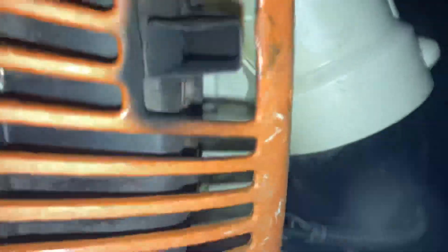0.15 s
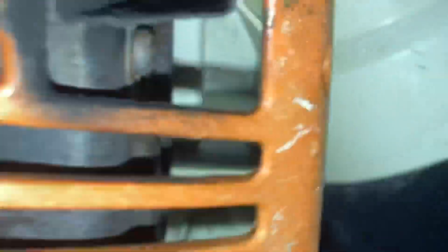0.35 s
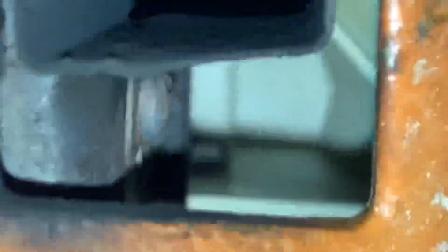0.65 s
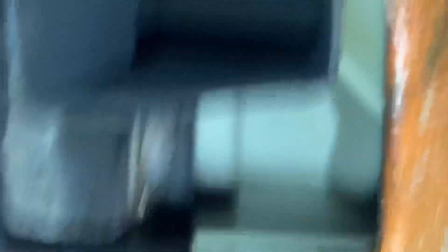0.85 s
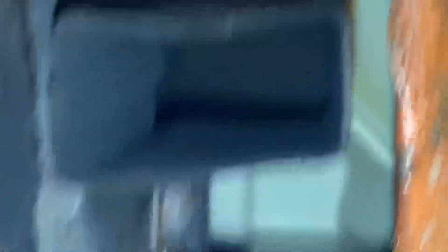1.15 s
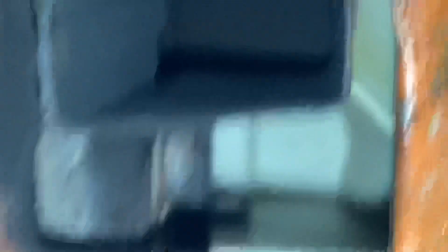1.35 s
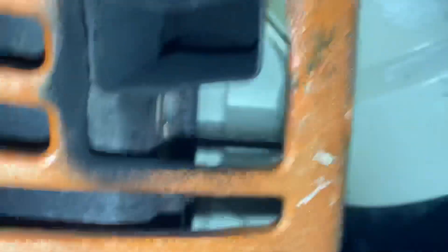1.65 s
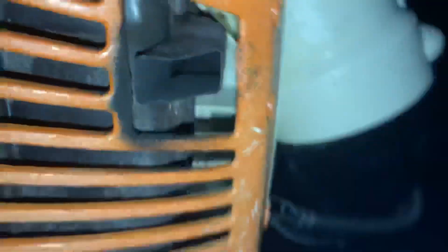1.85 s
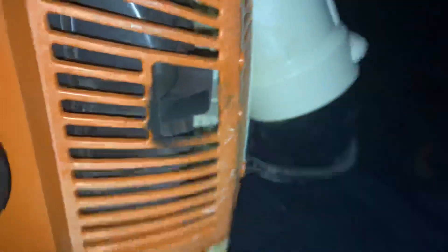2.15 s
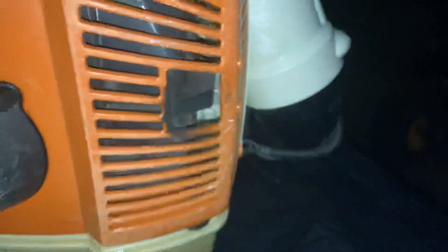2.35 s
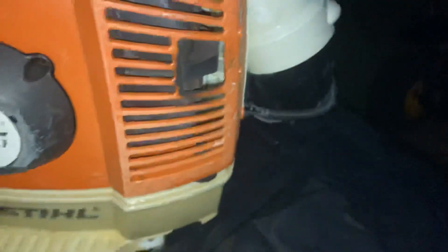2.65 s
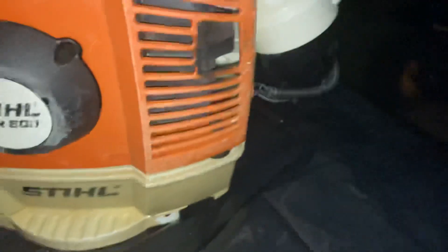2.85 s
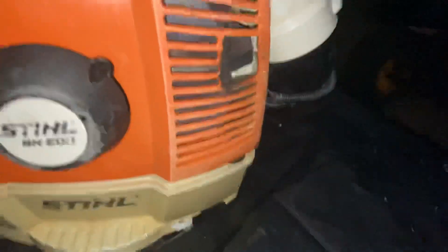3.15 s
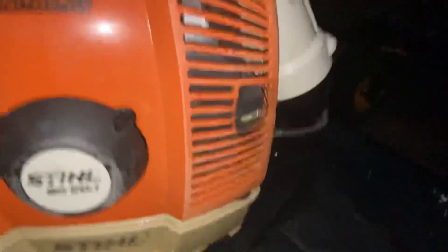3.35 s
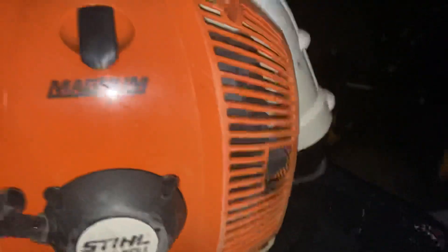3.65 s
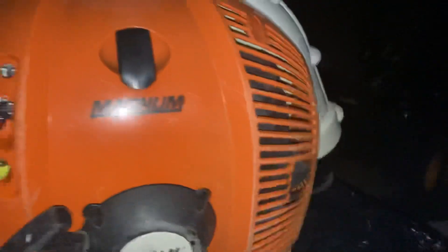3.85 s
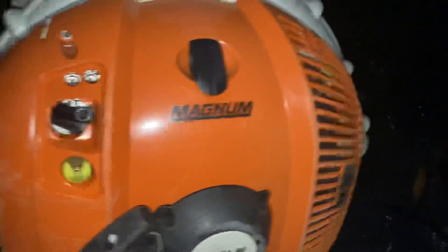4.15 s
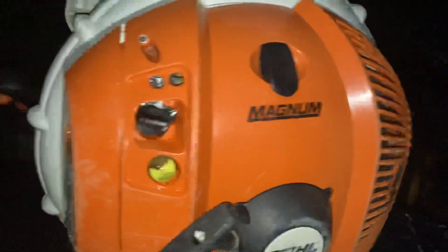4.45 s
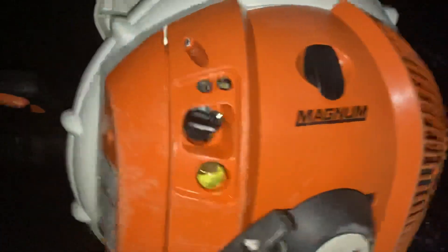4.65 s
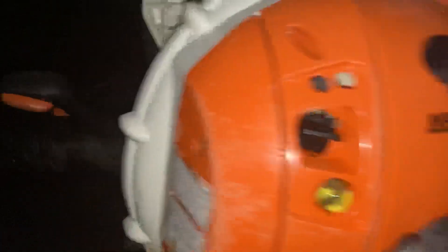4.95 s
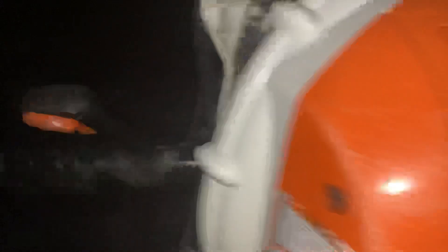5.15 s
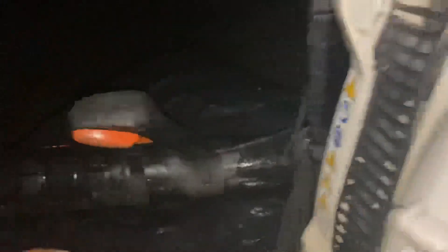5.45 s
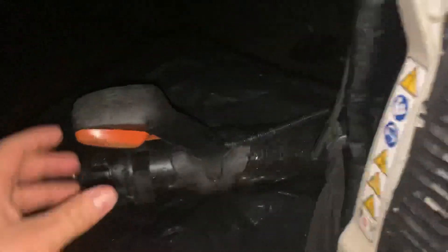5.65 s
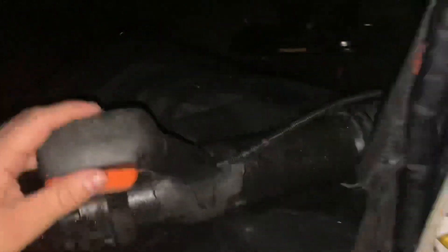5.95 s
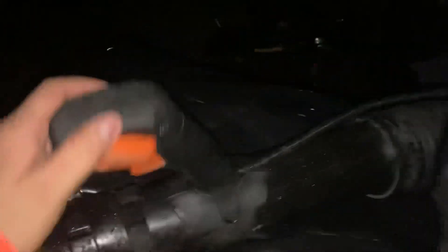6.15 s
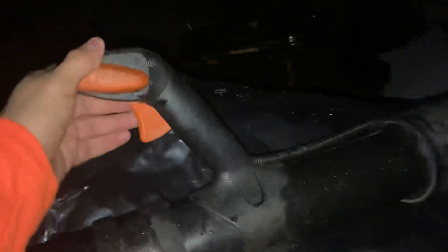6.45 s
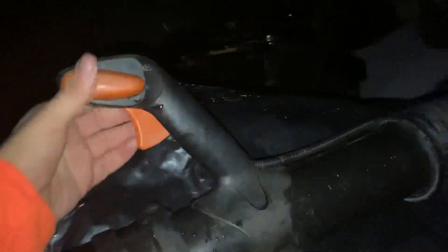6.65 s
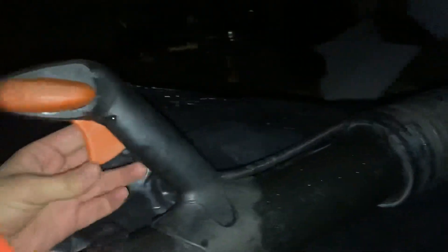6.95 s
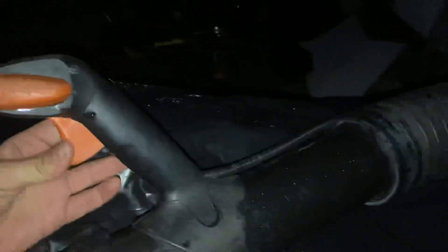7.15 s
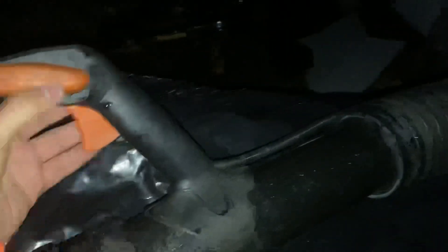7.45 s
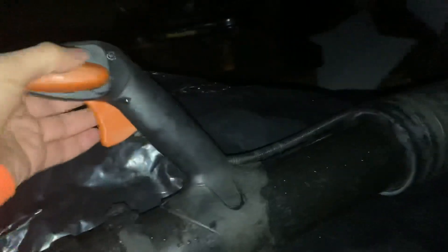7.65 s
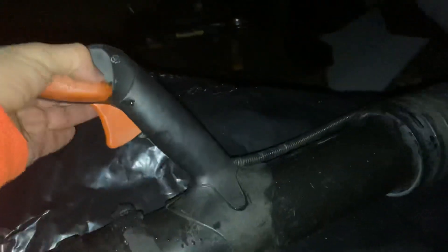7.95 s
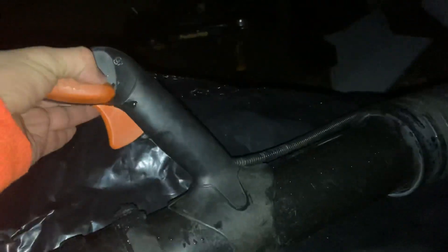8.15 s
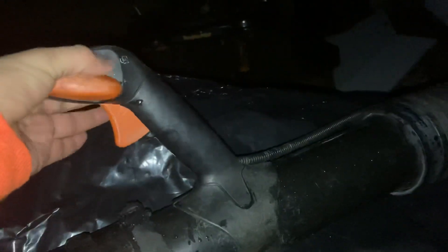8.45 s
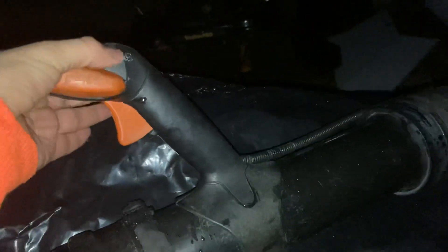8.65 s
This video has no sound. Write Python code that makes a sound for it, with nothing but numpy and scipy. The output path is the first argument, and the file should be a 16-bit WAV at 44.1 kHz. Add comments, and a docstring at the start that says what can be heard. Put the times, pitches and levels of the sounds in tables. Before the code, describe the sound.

A small leaf blower engine idles with uneven, hissing exhaust pops up close, then softens to a muffled putter and fan hum.

```python
"""Leaf blower at idle

A small four-stroke engine idles unevenly outdoors; most strong firings are followed by a weak one.
Each pop is a burst of gas that hisses, barks, thumps and rings the muffler shell. A hand-held
microphone pair starts at the exhaust, where the gas jet buffets it, and moves round the housing
to the handle, where the roar and hum of the fan cover the muffled exhaust."""
import sys
import numpy as np
from scipy import signal
from scipy.io import wavfile
from scipy.ndimage import uniform_filter1d

SR = 44100
rng = np.random.default_rng(int(sys.argv[2]) if len(sys.argv) > 2 else 0)


def transcribe(signal):
    """Save signal, clipped to [-1, 1], as a 16-bit WAV file at the path in sys.argv[1]."""
    frames = np.atleast_2d(signal).T
    limited = np.clip(frames, -1, 1)
    pcm = np.round(limited * 32767).astype(np.int16)
    wavfile.write(sys.argv[1], SR, pcm)


N = 388504
TIME = np.arange(N) / SR

# The groove, set by the firings that catch well: (time [s], hiss level [dB])
FIRINGS = [(0, -17.5), (0.053, -18), (0.1088, -11.5), (0.1644, -17.5), (0.2206, -15.5), (0.274, -22),
           (0.3322, -10), (.44, -12.5), (.494, -14), (0.5493, -17.5), (0.6044, -11), (0.715, -9.5),
           (.826, -12.5), (0.8811, -27.5), (0.936, -14), (1.044, -11.5), (1.099, -21), (1.155, -11.5),
           (1.2628, -12.5), (1.3732, -11), (1.4282, -11), (1.538, -11.5), (1.59, -20.5), (1.645, -18.5),
           (1.7022, -22), (1.759, -15), (1.817, -24.5), (1.8747, -15.5), (1.9317, -21), (1.989, -22.5),
           (2.0452, -15.5), (2.1542, -19), (2.209, -28.5), (2.263, -18.5), (2.3195, -26.5), (2.377, -16),
           (2.488, -15.5), (2.597, -18.5), (2.7096, -18.5), (2.766, -29), (2.8218, -18), (2.8791, -26.5),
           (2.936, -16.5), (3.049, -15), (3.1605, -19), (3.274, -14), (3.386, -14.5), (3.4989, -19.5),
           (3.6099, -19), (3.7232, -16.5), (3.8341, -19), (3.9469, -24), (4.0024, -27.5), (4.0591, -19.5),
           (4.1132, -28), (4.1702, -15.5), (4.2786, -16.5), (4.3337, -27.5), (4.447, -21.5), (4.56, -22),
           (4.6715, -20.5), (4.785, -23.5), (4.8939, -19.5), (5.004, -24), (5.1179, -25.5), (5.173, -32),
           (5.231, -28.5), (5.285, -39), (5.34, -32), (5.456, -35), (5.567, -40.5), (5.6835, -35),
           (5.7953, -37.5), (5.9044, -40), (6.1847, -39), (6.242, -44), (6.297, -43), (6.4097, -36.5),
           (6.5186, -42), (6.6301, -41.5), (6.7381, -39), (6.848, -45), (6.9042, -43.5), (7.017, -42),
           (7.069, -38.5), (7.18, -45.5), (7.236, -49), (7.347, -41), (7.4595, -42), (7.5126, -40),
           (7.57, -47.5), (7.626, -40.5), (7.739, -41.5), (7.8481, -44), (7.903, -43.5), (7.9586, -40.5),
           (8.067, -45.5), (8.1208, -40), (8.2316, -36), (8.3425, -43.5), (8.454, -40), (8.5625, -37.5),
           (8.669, -38.5), (8.721, -44)]


def cycles(spacing_s=.0555):
    """Start of every engine cycle, filled in evenly between good firings, and the good ones' indices."""
    good_s = np.transpose(FIRINGS)[0]
    good = np.append(0, np.cumsum(np.round(np.diff(good_s) / spacing_s))).astype(int)
    starts = np.interp(np.arange(good[-1] + 1), good, good_s)
    return np.append(starts, good_s[-1] + spacing_s), good


# Weight of a typical good firing: (time [s], bark level [dB], thump level [dB])
POP_BODY = [(0, -12, -20), (.17, -14, -20.5), (.25, -17.5, -29), (1.5, -17.5, -27.5), (1.9, -22, -27),
            (2.4, -21, -25), (3.7, -18, -25), (4.1, -20.5, -27.5), (4.4, -19, -31), (4.9, -18, -27),
            (5.4, -30, -31), (5.8, -28, -33), (6.4, -32.5, -35), (7.2, -33, -38), (8.81, -30.5, -33)]


def pops():
    """Time and hiss, bark and thump level of each pop; bark and thump partly follow its strength."""
    pop_s, good = cycles()
    good_s, good_db = np.transpose(FIRINGS)
    usual_db = np.interp(pop_s, good_s, uniform_filter1d(good_db, size=7, mode="nearest"))
    hiss_luck, bark_luck, thump_luck = rng.standard_normal((len(pop_s), 3)).T
    far = at_handle(pop_s)
    # Weak firings sit under their good neighbours, less deeply and less evenly at the handle.
    accent_db = np.minimum(-16 + 7.5 * far + (1 - 6.5 * far) * hiss_luck, 0)
    accent_db[good] = good_db - usual_db[good]
    bark_db = column(POP_BODY, 1, pop_s) + 0.64 * accent_db + bark_luck
    thump_db = column(POP_BODY, 2, pop_s) + 0.2 * accent_db + 2 * thump_luck
    return pop_s, usual_db + accent_db, bark_db, thump_db


def on_pops(gains, shape):
    """Triggers one shape on every pop, each with its own gain."""
    triggers = np.zeros(N, gains.dtype)
    triggers[np.round(cycles()[0] * SR).astype(int)] = gains
    return signal.oaconvolve(triggers, shape)[:N]


def accent(db):
    """How far each pop stands above its neighbours, in dB."""
    return db - uniform_filter1d(db, size=9)


def puff(rise_s, fall_s):
    """Envelope of a gas burst, peak 1."""
    t = np.arange(4000) / SR
    shape = (1 - np.exp(-t / rise_s)) ** 4 * np.exp(-t / fall_s)
    return shape / shape.max()


def jet(gas, db, burst_shape, push_db, follow, push_s, end_s):
    """Noise in a sudden blow-down burst, then a slower piston push that only partly follows the accent."""
    t = np.arange(2500) / SR
    accent_db, far = accent(db), at_handle(cycles()[0])
    weak_db = np.minimum(accent_db, 0)  # a weak firing leaves little pressure to blow down
    burst_db = db + weak_db - 1.5 * far  # the housing softens the burst at the handle
    burst = on_pops(amp(burst_db), burst_shape)
    spike_shape = np.exp(-((t - .0045) / .0012) ** 2)  # the valve flow peaks in a short snap
    spike = on_pops((1 - far) * amp(burst_db + weak_db + 3), spike_shape)
    stroke = np.sin(np.pi / 2 * np.minimum(t / push_s, 1)) ** 2
    stroke *= np.exp(-np.maximum(t - 2 * push_s, 0) / end_s)
    push = on_pops(amp(db - (1 - follow) * accent_db + push_db), stroke)
    # Behind the housing each burst arrives scattered, as a smear that opens just ahead of it.
    smear = on_pops(far * amp(db - 4.5), puff(rise_s=0.0035, fall_s=0.013))
    early = round(0.0069 * SR)
    smear = np.pad(smear[early:], (0, early))
    spits = amp(6.6 * uniform_filter1d(rng.standard_normal(N), size=49))  # turbulence breaks up the jet
    return gas * np.sqrt(burst ** 2 + spike ** 2 + push ** 2 + smear ** 2) * spits


# Gas EQ, one curve each for exhaust, side and handle: (frequency [Hz], level [dB])
GAS_EQ = [
    [(250.0, -13), (330, -3.5), (430, 14.5), (560, -1), (660, -5), (817.0, -11.5), (1250.0, -7),
     (2500, -13.5), (3000, -12), (3700, -6.5), (4800, -11.5), (5500, -12.5), (6000, -24), (6700, -11.5),
     (7580.0, -11.5), (8490.0, 7), (11300.0, 8.5), (15300.0, -3.5), (16200.0, -48), (16700.0, -53)],
    [(250.0, 3), (535.0, -13.5), (690.0, -8.5), (1280.0, -5.5), (2120, -8.5), (2600.0, -5.5), (4050.0, 0),
     (4300, -0.5), (5650, -2.5), (6400, 1), (7250.0, 10.5), (8200, 1), (10900.0, 0.5), (15300.0, -6),
     (16200.0, -37), (16700.0, -40)],
    [(250, -57), (350, -10.5), (540, 10.5), (640, -5), (790, -12), (1070, -9.5), (1520, -9), (2100, -16),
     (2750, -18), (5400, -29.5), (8250, -23), (11300, -25), (16700, -52)],
]
# Fader on the rasp, the lower part of the hiss: (time [s], gain [dB])
RASP_FADER = [(0, 1.5), (.8, -2), (1.5, -3), (2.3, 2.5), (3.2, -3), (4, 1), (4.7, -2.5), (5.3, 4.5), (6, 5),
              (7, 3.5), (8.81, 3.5)]


def exhaust_hiss(pop_s, hiss_db, split_hz=6600):
    """Top end of the escaping gas: a rasp, a shorter bright snap, and a valve tick after each pop."""
    gas = noise(GAS_EQ, 3000, 20000, flicker_db=4.5)
    dull = signal.sosfiltfilt(signal.butter(4, split_hz, fs=SR, output="sos"), gas)
    bright = gas - dull
    rasp_db = hiss_db + column(RASP_FADER, 1, pop_s) - 2
    rasp = jet(dull, rasp_db, puff(0.0026, 0.0081), push_db=-2, follow=0.6, push_s=0.0063, end_s=0.0036)
    snap = jet(bright, hiss_db - 2.5, puff(0.0017, 0.004),
               push_db=-4.5, follow=0.39, push_s=0.0065, end_s=0.0038)
    near = np.clip(1.1 - place_at(pop_s), 0, .5)
    casing_db = column(BED_FADERS, 2, pop_s)
    tick = on_pops(near * amp(casing_db + 3), puff(rise_s=.001, fall_s=0.003))
    tick_delay = round(0.032 * SR)
    return rasp + snap + bright * np.pad(tick, (tick_delay, 0))[:N]


def exhaust_body(pop_s, bark_db):
    """Midrange of the escaping gas: a hard bark over the steadier throb of the muffler."""
    bark = jet(noise(GAS_EQ, 944, 2700, flicker_db=3), bark_db - 10, puff(0.0019, 0.01),
               push_db=-1, follow=0.17, push_s=0.0074, end_s=0.0044)
    throb_db = column(BED_FADERS, 3, pop_s) + 0.24 * accent(bark_db) + 0.16
    throb = jet(noise(GAS_EQ, 330, 890, flicker_db=4.5), throb_db, puff(0.001, 0.0058),
                push_db=-3.5, follow=0.44, push_s=0.0096, end_s=0.0039)
    return bark + throb


def exhaust_thump(thump_db):
    """Low punch of the pressure pulse; its pitch drops as the muffler empties."""
    t = np.arange(2500) / SR
    turns = 75 * t + 1.5 * (1 - np.exp(-t / .0055))  # dives from about 350 to 75 Hz
    envelope = (1 - np.exp(-t / 0.00051)) ** 2 * np.exp(-(t / 0.022) ** 2)
    thump = envelope * np.cos(2 * np.pi * (turns - .15))
    return pan(on_pops(amp(thump_db - 0.5), thump))


# Modes of the muffler shell and cylinder fins:
# (frequency [Hz], t60 [s], level at exhaust [dB], at grille [dB], at side [dB], at handle [dB])
SHELL_MODES = [(891, 0.041, -16, -12, -23, 2.5), (1058, 0.035, 1.5, -10, -22, 5.5),
               (1259, 0.023, 3, 6, 3, -1), (1452, 0.022, -15, 1.5, 5.5, -13),
               (1648, 0.037, -8, -23, 5, -12), (2073, 0.027, 4.5, -21, -20, -28.5),
               (2571, 0.029, -6, 3, -9.5, -20), (2706, 0.039, -4.5, -19, -7, -3),
               (3270, .03, -2, -2, -43, -18), (3524, 0.033, -15, -5, -5.5, -30),
               (3694, 0.034, -12, -1, -12, -17), (4210, 0.049, -16.5, -2, -11.5, -14)]


def shell_ring(pop_s, bark_db, scatter=.35):
    """Each firing rings the metal, every mode with a strength and phase of its own."""
    t, out = np.arange(3000) / SR, np.zeros((2, N))
    place, far = place_at(pop_s), at_handle(pop_s)
    strikes = 1 + rng.standard_normal((len(pop_s), len(SHELL_MODES), 2)) @ [scatter, 1j * scatter]
    strikes *= np.exp(2j * np.pi * rng.random(strikes.shape))
    spreads = np.exp(1.2j * far * rng.standard_normal(strikes.shape).T)  # wider image at the handle
    for (hz, t60, *place_db), strike, spread in zip(SHELL_MODES, strikes.T, spreads):
        mode_db = np.interp(place, [.25, .76, 1.15, 1.7], place_db)  # exhaust, grille, side, handle
        gains = strike * amp(bark_db + 3 + 0.5 * far + mode_db + ground_echo_db(hz, pop_s))
        ring = amp(-60 * t / t60) * (1 - np.exp(-t / 0.0046)) ** 2 * np.exp(2j * np.pi * hz * t)
        lean = left_gain(np.array([hz]), pop_s)[0]
        lag = np.exp(-1j * left_lead(np.array([hz]), pop_s)[0])
        out[0] += on_pops(gains * lean, ring).real
        out[1] += on_pops(gains * lag * spread / lean, ring).real
    return out


def buffet(pop_s, hiss_db):
    """The slug of gas from a strong firing hits the microphone a moment later as a falling low whump."""
    t, out = np.arange(-900, 1800) / SR, np.zeros(N + SR)
    levels_db = hiss_db + column(WALK, 3, pop_s)
    for at, db, (late, pitch, phase) in zip(pop_s, levels_db, rng.random((len(pop_s), 3))):
        hz = 75 * (0.7 + .6 * pitch)
        whump = np.exp(-(t / .012) ** 2) * np.cos(2 * np.pi * (hz * t * (1 - 15 * t) + phase))
        start = round((at + 0.0141 + 0.0022 * late) * SR)
        out[start:start + len(t)] += amp(db) * whump
    return pan(out[:N])


# Fan and casing EQ, one curve each for exhaust, side and handle: (frequency [Hz], level [dB])
FAN_EQ = [
    [(40.0, 3), (89.9, 13.5), (305, 2.5), (380, 0), (430, 16.5), (560, -14), (650, -11.5), (904.0, -29),
     (2700.0, -29.5), (3800, -34.5), (4700, -43), (5500, -46), (6700, -39.5), (7650.0, -47), (8390.0, -40),
     (11100.0, -35.5), (16000.0, -56), (16700.0, -81)],
    [(40.0, -3), (152.0, -31), (179.0, 2.5), (228.0, -4.5), (290, -5.5), (556.0, -12), (769.0, -3),
     (1150.0, -16), (1870.0, -7.5), (2120.0, -14), (2700, -11), (3500, -22.5), (4600, -19), (5300, -26),
     (7200, -21), (9100.0, -28.5), (15400.0, -38), (16000.0, -66), (16700.0, -94)],
    [(40, -15), (150, -6.5), (230, -6), (340, -3), (540, -11.5), (610, -28), (790, -23.5), (1150, -24.5),
     (1470, -22), (2200, -37), (2700, -31), (5700, -46), (6700, -41.5), (9100, -47), (15400, -54.5),
     (16700, -85)],
]
# Faders of the steady bed: (time [s], fan roar [dB], casing hiss [dB], muffler throb [dB])
BED_FADERS = [(0.0, -24.5, -32.5, -26), (0.19, -32.5, -39, -28), (0.44, -31, -37, -24),
              (0.78, -40, -39, -30.5), (1.37, -32.5, -38, -27), (2.45, -38.5, -41, -32),
              (4.39, -37.5, -42.5, -35), (5.6, -37, -45, -37), (6.87, -36.5, -46.5, -39),
              (8.46, -34, -46, -35), (8.81, -34.5, -43, -45)]


def fan():
    """Low roar of the impeller under the airy hiss of the casing."""
    roar = amp(column(BED_FADERS, 1, TIME) - 1.36) * noise(FAN_EQ, 20, 696, flicker_db=0.5)
    casing = amp(column(BED_FADERS, 2, TIME) + 0.9) * noise(FAN_EQ, 788, 21600, flicker_db=3.5)
    return roar + casing


BLADE_ORDER = 12  # the impeller hums at this multiple of the firing rate
# Fader on the impeller hum: (time [s], level [dB])
HUM_FADER = [(0, -48), (1.5, -46), (1.9, -47.5), (2.3, -43), (2.9, -43), (3.5, -41), (4.0, -41.5),
             (4.3, -39.5), (4.9, -40.5), (5.5, -39.5), (6, -43), (6.4, -50), (7, -47.5), (7.5, -42),
             (8.0, -54), (8.4, -51), (8.8, -45.5)]


def impeller_hum(pop_s, hiss_db):
    """A tone and its octave follow the impeller; a strong firing jolts it and swells the hum."""
    accent_db = np.interp(TIME, pop_s, accent(hiss_db))
    phase = 2 * np.pi * BLADE_ORDER * crank(pop_s) + 0.05 * accent_db
    octave = amp(-18 + 24 * past_side(TIME)) * np.sin(2 * phase)
    level = np.sqrt(2) * amp(column(HUM_FADER, 1, TIME) + 0.05 * accent_db)
    return pan(level * (np.sin(phase) + octave))


# Harmonics 3 to 20 of the firing rate, skipping the impeller's: (level at side [dB], at handle [dB])
ENGINE_HARMONICS = [(-50, -46), (-59.5, -53), (-55, -62), (-51.5, -50), (-55.5, -48.5), (-55, -50),
                    (-55, -51), (-48, -44), (-49, -53), (-65, -52), (-58, -47), (-46.5, -54), (-62, -67),
                    (-51, -52), (-50, -50), (-57, -44.5), (-54, -55)]


def engine_drone(pop_s):
    """Wavering tones on multiples of the firing rate."""
    turns, behind, tones = crank(pop_s), past_side(TIME), np.zeros(N)
    shield_db = 7 * np.clip(1 - place_at(TIME), 0, 1)  # the muffler shields the engine block
    orders = np.setdiff1d(np.arange(3, 21), BLADE_ORDER)
    for order, (side_db, handle_db) in zip(orders, ENGINE_HARMONICS):
        db = side_db + behind * (handle_db - side_db) - shield_db
        waver = np.interp(TIME, np.arange(100) / 10, rng.standard_normal(100))
        phase = 2 * np.pi * order * turns + order ** 2 + .2 * waver[::-1]
        tones += amp(db + 1.5 * waver) * np.sin(phase)
    return pan(tones)


def crank(pop_s):
    """Engine cycles run so far; the flywheel evens the speed."""
    count = np.arange(len(pop_s))
    steady = np.polyfit(pop_s, count, deg=1)
    drift = uniform_filter1d(count - np.polyval(steady, pop_s), size=4)
    return np.polyval(steady, TIME) + uniform_filter1d(np.interp(TIME, pop_s, drift), size=3500)


# Resonances of the blower tube: (frequency [Hz], width [Hz], level [dB])
TUBE_MODES = [(281, 18, -46), (348.4, 11, -47), (427.5, 8.2, -51), (491, 13, -45), (552, 9.3, -60)]


def tube():
    """The air stream sounds the narrow resonances of the tube, heard at the handle."""
    air, out = rng.standard_normal(N), np.zeros(N)
    for hz, width, db in TUBE_MODES:
        bandpass = signal.butter(1, [hz - width / 2, hz + width / 2], "band", fs=SR, output="sos")
        band = signal.sosfilt(bandpass, air)
        out += amp(db) * band / band.std()
    return pan(out * at_handle(TIME))


# The microphone move: (time [s], place [0 exhaust, 1 side, 2 handle], bearing [0 left, 1 ahead, 2 right],
# buffet gain [dB], ground comb spacing [Hz], comb depth [dB])
WALK = [(0, 0.9, 0.053, 4.5, 498, 3.5), (0.249, 0.34, 0, -10, 503, 2), (1.3, 0.26, 0.14, -10.5, 553, 0.5),
        (1.55, 0.31, 0.047, -10, 543, -0.5), (1.9, 0.25, 0.24, -16, 640, 4), (2.6, 0.75, 0.6, -76, 667, 3),
        (3.6, 0.71, 1.07, -48, 800, 0.5), (4.2, 1.04, 1.07, -61, 870, 1), (4.8, 1.06, 1.38, -57, 774, 1.5),
        (5.3, 1.14, 1.68, -62, 745, -2), (6, 1.62, 1.8, -71, 526, -0.5), (6.7, 1.79, 1.9, -42, 514, 1),
        (8.81, 1.78, 1.9, -16, 560, 0)]


def place_at(t):
    """Where the microphone is: 0 exhaust, 1 side, 2 handle."""
    return column(WALK, 1, t)


def past_side(t):
    """Crossfade from 0 at the side to 1 at the handle."""
    return np.clip(place_at(t) - 1, 0, 1)


def at_handle(t):
    """Quicker crossfade, full halfway from the side to the handle."""
    return np.minimum(2 * past_side(t), 1)


def ground_echo_db(hz, t):
    """The echo off the ground lifts evenly spaced bands, which slide as the microphone moves."""
    reach = 1 / (1 + (400 / (hz + 1)) ** 8 + (hz / 4800) ** 8)
    return column(WALK, 5, t) * reach * np.cos(2 * np.pi * hz / column(WALK, 4, t))


# A moving, hollow EQ bell: (time [s], frequency [Hz], boost [dB])
HOLLOW_BELL = [(1.9, 585, 9.5), (2.4, 670, 4), (3.3, 794, 3), (3.9, 830, 7), (4.5, 746, 0), (5.3, 707, 11),
               (5.8, 670, 2)]


def hollow_db(hz, t, width_hz=80):
    """The gap between microphone and housing resonates."""
    detune = (hz - column(HOLLOW_BELL, 1, t)) / width_hz
    return column(HOLLOW_BELL, 2, t) * np.exp(-detune ** 2)


# Mono-ness of the noise, one curve each for exhaust, side and handle: (frequency [Hz], coherence [0-1])
COHERENCE = [
    [(100, 0.82), (600, 1), (1000, 0.71), (3500, 0.4), (6000, 1), (8000, 0.94)],
    [(100, .995), (600, 0.99), (1500, 0.75), (3500, 0.56), (6000, 0.3), (8000, 1)],
    [(100, .97), (400, .92), (750, .6), (1300, .45), (2200, .3), (6500, .3), (8500, .96)],
]


def noise(eq, lo_hz, hi_hz, flicker_db):
    """A flickering band of stereo noise, rms 1, coloured and placed by the microphone move."""
    t, hz = np.arange(N // 256 + 5) * 256 / SR, np.fft.rfftfreq(1024, 1 / SR)
    left_re, left_im, wide_re, wide_im, flicker = rng.standard_normal((len(t), len(hz), 5)).T
    left, wide = left_re + 1j * left_im, wide_re + 1j * wide_im
    flicker = 6 * uniform_filter1d(uniform_filter1d(flicker, size=5, axis=0), size=7, axis=1)
    colour_db = blend(eq, hz, place_at(t)) + ground_echo_db(hz[:, None], t) + hollow_db(hz[:, None], t)
    band = 1 / np.sqrt((1 + (lo_hz / (hz + 1)) ** 8) * (1 + (hz / hi_hz) ** 8))
    gain = amp(colour_db + flicker_db * flicker) * band[:, None]
    gain /= np.sqrt((gain ** 2).sum(0))
    mono = np.clip(blend(COHERENCE, hz, place_at(t)), 0, 1)
    right = mono * left * np.exp(-1j * left_lead(hz, t)) + np.sqrt(1 - mono ** 2) * wide
    lean = left_gain(hz, t)
    spectra = np.array([left * lean, right / lean]) * gain
    out = signal.istft(spectra, nperseg=1024, noverlap=768)[1][:, :N]
    return out / np.sqrt(np.mean(out ** 2))


# Balance, one curve each for exhaust, side and handle: (frequency [Hz], left over right [dB])
BALANCE = [
    [(60, 5), (150, 4.5), (380, -4), (950, 7.5), (2380, -0.5), (5980, 1), (15000, 0)],
    [(60, -4), (150, -3.5), (380, 2), (950, 2.5), (2380, 2.5), (5980, -1), (15000, 0)],
    [(60, -11), (240, -2.5), (950, 0.5), (3770, -0.5), (15000, -0.5)],
]


def left_gain(hz, t):
    """Half the balance goes to the left channel; the right takes the inverse."""
    return amp(blend(BALANCE, hz, place_at(t)) / 2)


# Stereo phase, one curve each for bearing left, ahead and right: (frequency [Hz], left lead [turns])
STEREO_PHASE = [
    [(30, .03), (100, .06), (550, .08), (1100, .28), (1800, .5), (2300, 1), (3300, 1.5), (4200, 2),
     (5500, 2.35), (6700, 2.1)],
    [(30, -.02), (400, 0), (1000, .08), (1700, .2), (2100, .6), (2500, 1), (3300, 1.3), (4500, 1.5),
     (6700, 1.6)],
    [(30, -.03), (130, -.06), (300, -.12), (600, -.26), (1000, -.3), (1700, -.3), (2200, -.5), (3400, -.5),
     (4500, -.4)],
]


def left_lead(hz, t):
    """Radians by which the left microphone leads; the treble keeps one slope from every side."""
    turns = blend(STEREO_PHASE, hz, column(WALK, 2, t))
    treble_turns = (6900 - hz[:, None]) / 4400
    return 2 * np.pi * np.where(hz[:, None] < 6700, turns, treble_turns)


def pan(x, phase_hz=130., balance_hz=250.):
    """A low sound reaches one microphone before the other, and at a different level."""
    at = np.arange(N)
    shift = left_lead(np.array([phase_hz]), TIME)[0] / (2 * np.pi * phase_hz) * SR / 2
    lean = left_gain(np.array([balance_hz]), TIME)[0]
    return np.array([lean * np.interp(at + shift, at, x), np.interp(at - shift, at, x) / lean])


def blend(curves, hz, position):
    """Morphs between three curves, read on a log frequency axis, as position runs from 0 to 2."""
    shares = np.clip(1 - abs(np.clip(position, 0, 2) - np.arange(3)[:, None]), 0, 1)
    spectra = [np.interp(np.log(hz + 1), np.log(f + 1), value) for f, value in map(np.transpose, curves)]
    return np.transpose(spectra) @ shares


def column(table, index, t):
    """One automation lane of a table at times t."""
    return np.interp(t, np.transpose(table)[0], np.transpose(table)[index])


def amp(db):
    return 10 ** (np.asarray(db) / 20)


def scene():
    """The mix: exhaust pops, their ring and buffet, over the bed of fan, engine and tube."""
    pop_s, hiss_db, bark_db, thump_db = pops()
    exhaust = exhaust_hiss(pop_s, hiss_db) + exhaust_body(pop_s, bark_db) + exhaust_thump(thump_db)
    front = exhaust + shell_ring(pop_s, bark_db) + buffet(pop_s, hiss_db)
    return front + fan() + impeller_hum(pop_s, hiss_db) + engine_drone(pop_s) + tube()


def record(dry):
    """The microphone rolls off the bass and overloads softly; a steep low-pass trims the top."""
    ceiling, top_hz = .97, 16900
    thin = signal.sosfilt(signal.butter(2, 42, "high", fs=SR, output="sos"), dry)
    saturated = thin / (1 + (thin / ceiling) ** 4) ** .25
    lowpass = signal.firwin(511, top_hz, window=("kaiser", 9), fs=SR)
    return signal.oaconvolve(saturated, lowpass[None], "same")


dry = scene()
out = record(dry)
transcribe(out)
```